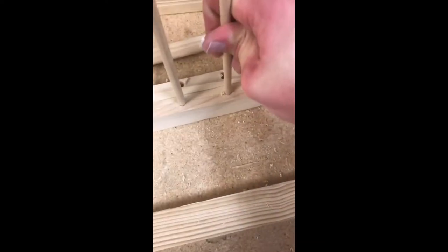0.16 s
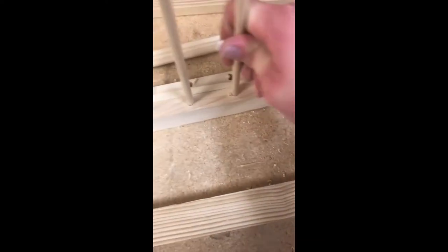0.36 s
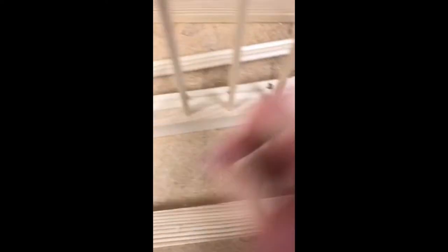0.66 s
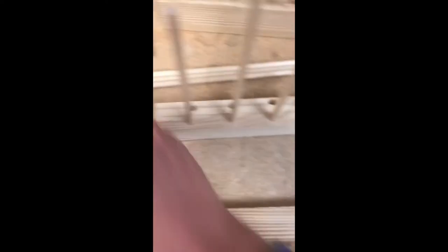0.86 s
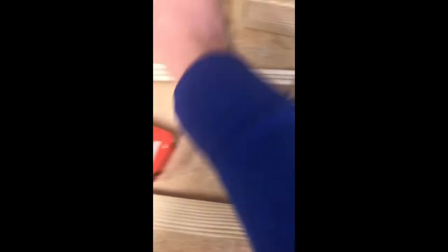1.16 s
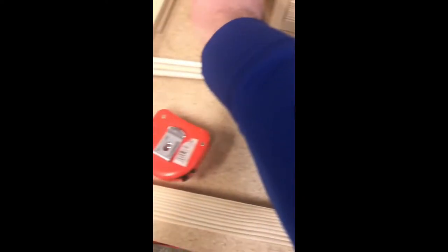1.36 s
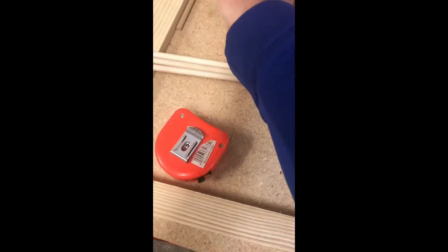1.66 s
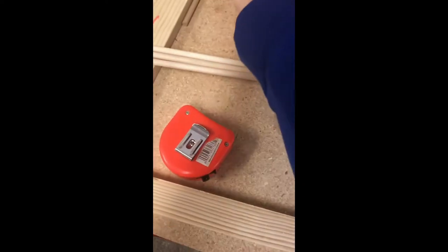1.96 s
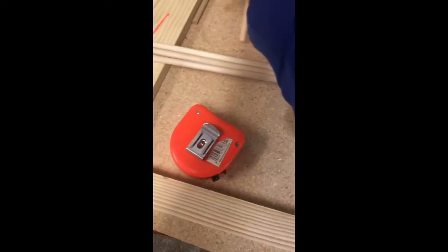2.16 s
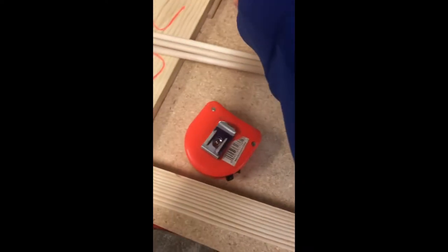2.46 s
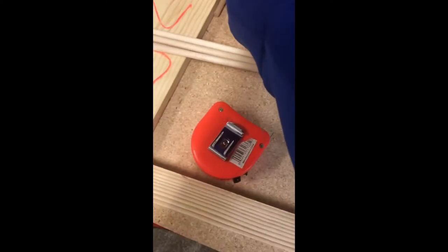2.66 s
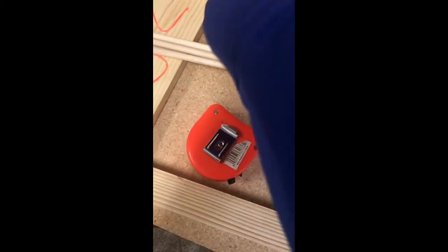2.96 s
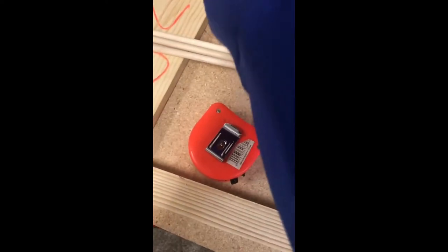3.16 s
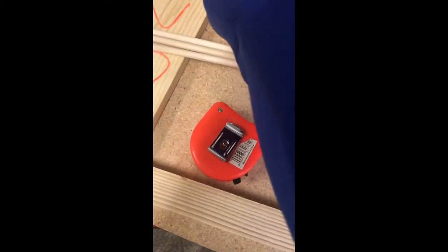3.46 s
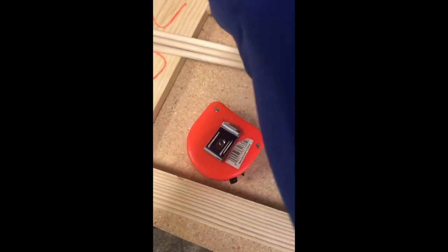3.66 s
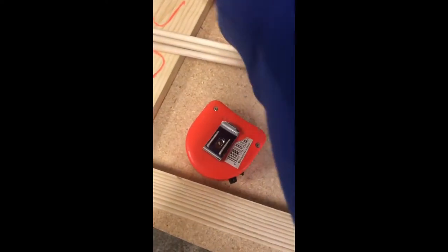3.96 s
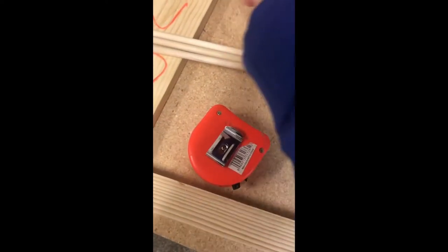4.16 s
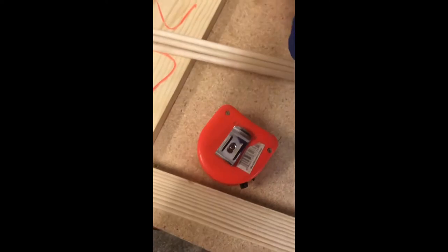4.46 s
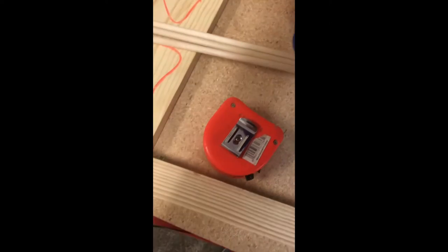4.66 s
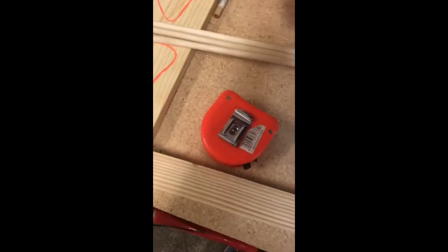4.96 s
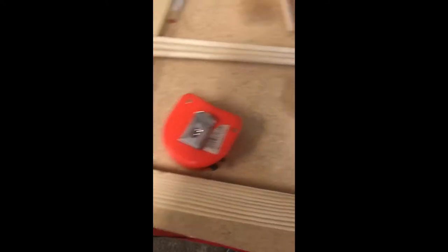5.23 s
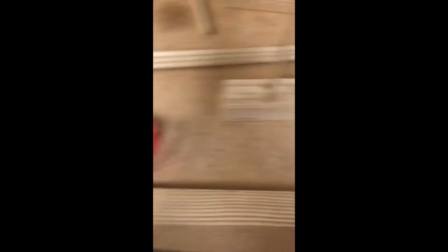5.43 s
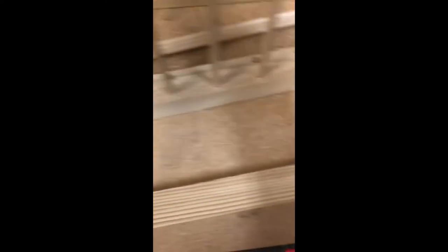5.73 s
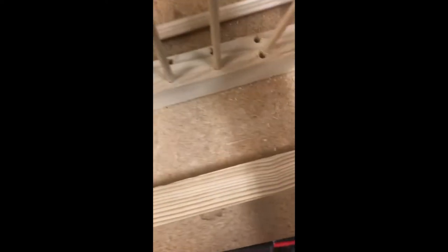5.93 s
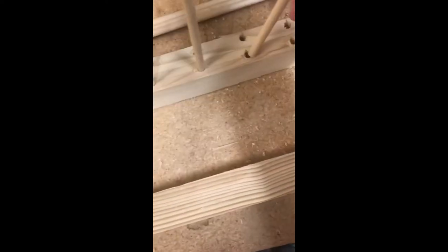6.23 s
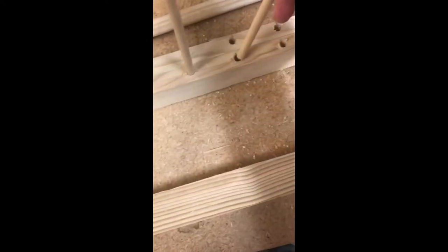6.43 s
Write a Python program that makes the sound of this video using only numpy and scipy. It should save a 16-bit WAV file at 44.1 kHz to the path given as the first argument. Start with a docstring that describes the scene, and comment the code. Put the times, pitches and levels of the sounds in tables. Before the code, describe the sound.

Close-up handling of loose wooden sticks: light ticks, a hollow knock, sharp bright clacks and brief scrapes in a quiet, faintly humming workshop.

```python
"""A small, faintly humming workshop: on a bench, a wooden dowel is pushed into a drilled rail, close to a phone.
Loose dowels are then slid, picked up and clacked together: noise cracks over ringing wood modes.
Coarse noise, spectrally shaped and sent through moving resonances, makes slides and swishes of dowel or sleeve.
Low modes make the bench thud and a board knock hollow; shaped, decaying noise makes two dull bumps.
Band-wise noise tails give the room's echo, under mains hum and shaped air noise."""
import sys
import numpy as np
from scipy import signal
from scipy.fft import rfft, irfft
from scipy.io import wavfile
from scipy.ndimage import uniform_filter1d

SR = 44100
rng = np.random.default_rng(int(sys.argv[2]) if len(sys.argv) > 2 else 0)


def store_wav(level_fs):
    """Save 16-bit WAV to argv[1]."""
    pcm = np.round(np.clip(np.atleast_2d(level_fs), -1, 1) * 32767)
    wavfile.write(sys.argv[1], SR, pcm.T.astype(np.int16))


N = 290619
TIME = np.arange(N) / SR  # s, the whole scene
AGE = np.arange(SR // 2) / SR  # s, since a blow

# Spectrum of the room's air noise. Each row: frequency in Hz, relative level in dB.
AIR_SPECTRUM = [(12, -37.5), (25, -17), (45, -5), (75, -9.5), (130, -15), (200, -13), (290, -14.5),
                (450, -19.5), (750, -22), (950, -21), (1200, -27), (3000, -31.5), (9000, -35.5),
                (16000, -36.5)]
AIR_DB = -64
# Mains hum. Each row: multiple of the mains frequency, mean level in dB.
HUM_HARMONICS = [(2, -66.5), (4, -70.5)]
MAINS_HZ = 60
# The workshop's echo. Each row: low edge in Hz, high edge in Hz, energy in dB, t60 in seconds.
ECHO_BANDS = [(80, 400, -18, 0.39), (648, 1365, -22, 0.4), (1500, 4930, -25.5, 0.35),
              (3950, 6800, -26, 0.17), (7810, 26000, -19, 0.18)]

# Dull bumps. Each row: start in seconds, level in dB, t60 in seconds.
BUMP_EVENTS = [(5.374, -47.5, 0.45), (5.488, -42.5, 0.21)]
# Spectrum of a bump. Each row: frequency in Hz, relative level in dB.
BUMP_SPECTRUM = [(30, -16.5), (90, 1.5), (160, -4), (300, -2.5), (500, -2), (800, 2.5), (1150, -8.5),
                 (1600, -16), (3000, -23), (6000, -59)]
# Hollow knocks on a board. Each row: start in seconds, level in dB.
KNOCK_EVENTS = [(0.364, -55.5), (1.683, -57.5), (1.9981, -30)]
# Free modes of the board. Each row: frequency in Hz, relative level in dB, t60 in seconds.
BOARD_MODES = [(600, 5, 0.19), (630, -15, 0.089), (1000, -9.5, 0.13), (1337, -11, 0.15),
               (1640, -5.5, 0.032)]

# Soft pushes on the bench top. Each row: start in seconds, level in dB before the mix, push pitch in Hz.
BENCH_PUSHES = [(0.225, -50, 198), (0.365, -41.5, 196), (.387, -45, 116), (1.143, -57, 92),
                (1.438, -41, 124), (1.585, -48, 118), (2.029, -50, 104), (2.516, -51.5, 166),
                (3.097, -50.5, 156), (3.191, -48.5, 177), (3.701, -53, 132), (3.9, -53.5, 120),
                (4.837, -40.5, 141), (5.504, -55, 129), (6.186, -53, 173)]
# Nominal modes of the bench top. Each row: frequency in Hz, relative level in dB, t60 in seconds.
BENCH_MODES = [(79, -3, 0.28), (109.3, -1.5, 0.28), (128, -2.5, 0.074), (184.5, 1.5, 0.097),
               (260.6, -4.5, 0.22), (336, -8.5, 0.03)]
# The bench's answer to each clack: dB relative to its weight, middle pitch, spread either way.
CLACK_THUD_DB, CLACK_PUSH_HZ, PUSH_SPREAD_OCT = -6, 153, 0.45

# Slides and swishes of a dowel or sleeve. Each row: start in seconds, length in seconds, then peak scrape
# and peak hiss in dB before the sliding gains.
STROKE_EVENTS = [(0.348, 0.14, -58, -53.5), (.45, .16, -67.5, -63), (.8, 0.52, -68.5, -72),
                 (1.25, 0.38, -78, -66.5), (1.545, 0.17, -62.5, -56), (1.664, 0.064, -61, -52),
                 (1.74, 0.25, -75, -67.5), (1.93, 0.17, -64, -56.5), (2.063, 0.12, -55.5, -52),
                 (2.214, 0.077, -52, -46.5), (2.35, .13, -68.5, -55), (2.5, 0.077, -66, -63),
                 (2.94, .15, -59, -58.5), (3.15, 0.073, -52.5, -59.5), (3.24, 0.22, -63, -68.5),
                 (3.55, 0.1, -69, -67.5), (3.678, 0.083, -44.5, -48.5), (3.83, 0.11, -46, -50),
                 (4.003, 0.046, -46, -49), (4.05, 0.35, -67, -55.5), (4.37, 0.074, -65.5, -58.5),
                 (4.54, 0.11, -62, -61.5), (4.624, 0.061, -53, -53), (4.81, 0.058, -49, -45.5),
                 (4.93, 0.21, -53.5, -62), (5.08, 0.095, -75, -53.5), (5.201, 0.3, -71, -62),
                 (5.48, 0.14, -85, -67.5), (5.65, 0.12, -83, -64), (6.3, 0.2, -67.5, -66.5)]
STROKE_RISE, STROKE_FALL = 0.26, 0.75  # shares of a stroke spent speeding up and slowing down
# Light rubbing while loose dowels are in hand: start in seconds, end in seconds.
HANDLING_SPAN = (1.5, 5.6)
HANDLING_SCRAPE_DB, HANDLING_HISS_DB = -75.5, -69  # before the sliding gains
# Spectrum of the scrape. Each row: frequency in Hz, relative level in dB.
SCRAPE_SPECTRUM = [(290, -45.5), (500, -14), (1010, -13.5), (1590, -1), (1870, -4.5), (2080, -6),
                   (3090, -3), (3820, -8.5), (4330, -8.5), (5000, -15.5), (6500, -43.5), (11000, -120)]
# Spectrum of the hiss. Each row: frequency in Hz, relative level in dB.
HISS_SPECTRUM = [(1500, -27), (3500, -11), (5000, -4), (7200, 0), (9000, -1), (11000, -1.5), (13500, -1.5),
                 (16000, -5)]
# Resonances of a sliding dowel. Each row: ratio to the main mode, width in Hz, relative level in dB.
SLIDE_RESONANCES = [(.515, 150.6, 0.5), (1, 342.8, -1.5), (1.56, 550.6, -1), (2.2, 750, -7),
                    (2.9, 1787, -8)]

# Main bending mode of the dowel in hand. Each row: time in seconds, pitch in Hz.
DOWEL_PITCH_PATH = [(.4, 4120), (1.55, 4870), (2.1, 4690), (2.9, 4500), (3.25, 4500), (3.92, 4450),
                    (4.3, 4540), (4.7, 4850), (5.1, 4737)]
# Nominal bending modes of a dowel. Each row: ratio to the main mode, relative level in dB, t60 in seconds.
DOWEL_MODES = [(.305, -22.5, .03), (.53, -14.5, 0.041), (0.774, -3.5, 0.016), (0.921, 2.5, .012),
               (1, 0, .045), (1.049, -3, 0.021), (1.55, -9, .028), (1.65, -13, .018), (2.211, -6, 0.028),
               (2.38, -4, 0.023), (2.9, -7, 0.013)]
# Dowel contacts. Each row: start in seconds, contact time in seconds, pitch of the wood that is hit in Hz,
# ring over crack in dB, treble level in dB before the mix, brightest pitch in Hz,
# weight on the bench in dB (the reference for low body and thud).
CLACK_EVENTS = [(0.2138, 0.0002, 1830, -9.5, -52.5, 6600, -65), (0.227, 0.0014, 1880, -5, -61, 8000, -56.5),
                (.362, 0.0012, 3170, -7, -48.5, 4550, -56), (0.385, 0.00026, 2580, 3, -44, 5300, -54.5),
                (1.436, 0.00017, 1670, -7, -44.5, 1820, -43),
                (1.5775, 0.00058, 2420, 1.5, -31.5, 6740, -48.5),
                (1.6566, 0.00017, 1260, -5, -35, 12000, -57), (1.674, 0.0021, 2600, 12, -40.5, 3470, -55.5),
                (1.7136, .0004, 2570, -7, -51, 11000, -72), (1.867, 0.00081, 2620, -20, -48, 10000, -60),
                (1.8792, 0.00065, 2700, -12, -32, 12000, -70),
                (1.909, 0.00065, 1660, -5, -42, 10100, -50.5), (2.012, 0.00054, 2680, -3, -37.5, 6300, -39),
                (2.1427, 0.0025, 2600, 7, -46, 2680, -51), (2.218, 0.0011, 1250, -7, -37.5, 2960, -46.5),
                (2.5363, 0.00088, 1800, -9, -45, 1900, -51),
                (2.8382, 0.0017, 1605, -6.5, -41.5, 2650, -51.5),
                (2.8692, 0.00078, 1820, -10.5, -20, 3000, -36),
                (2.8699, .0006, 3390, -2, -18.5, 10960, -56),
                (2.8819, 0.00049, 1380, -5.5, -40, 2980, -47.5),
                (2.9265, 0.0015, 2500, 15, -31.5, 4430, -46),
                (2.9681, 0.0012, 1420, -10.5, -33.5, 2800, -43.5), (3.051, .0007, 1630, -8, -52, 3430, -55),
                (3.2136, 0.00049, 3150, -4.5, -28.5, 2970, -55),
                (3.2321, 0.00068, 1740, -5, -31, 2780, -49.5), (3.24, 0.0034, 2680, -8, -35, 2020, -49.5),
                (3.2482, 0.00066, 2650, -8.5, -30.5, 3380, -51),
                (3.9131, 0.0001, 2334, -7, -16.5, 4710, -64), (3.9173, 0.00023, 2430, 7, -32, 4800, -68),
                (3.9263, 0.00024, 2380, -1, -43, 5000, -59), (4.011, 0.0025, 2704, 10, -41, 2820, -73),
                (4.019, .003, 2700, -20, -49, 11000, -75), (4.111, 0.00025, 2350, 8, -36, 6150, -51.5),
                (4.1237, 0.00033, 2550, 14, -43.5, 2180, -60), (4.5699, 0.00022, 1356, -15, -52, 3020, -40),
                (4.661, .0004, 2640, -1.5, -32.5, 5170, -45), (4.6862, 0.00074, 2540, -4, -35, 2170, -46.5),
                (4.8654, 0.0025, 2970, -22, -37, 9050, -52), (4.9065, 0.00053, 2550, 5, -49, 9520, -61),
                (4.9395, 0.0029, 2610, -0.5, -38, 3220, -51), (4.9476, .0006, 2560, -8, -36, 2900, -48),
                (4.987, 0.0004, 2530, -4, -35.5, 1970, -45), (5.0224, 0.0014, 1814, 8, -29, 4400, -47),
                (5.0315, 0.00038, 1792, 9.5, -28, 2860, -55), (5.047, 0.00063, 1850, -6, -23.5, 4200, -56),
                (5.061, 0.0006, 2770, -8, -27, 3180, -49.5), (5.083, 0.00045, 1800, -16, -44, 10600, -46),
                (5.1082, 0.00052, 1850, 13, -32.5, 4540, -48), (6.252, 0.0004, 1960, -5, -55.5, 8850, -73),
                (6.369, 0.002, 2310, -11, -56.5, 8060, -69.5),
                (6.4028, 0.001, 2020, -8.5, -58, 7500, -62.5),
                (6.5521, 0.00063, 1910, -4.5, -56, 8300, -63)]
# Edges of the bands that balance a contact, in Hz; the first band is its low body.
CLACK_BAND_EDGES = [300, 1200, 3200, 8000, 16000]
SKIRT_DB_PER_OCT = 12.5  # treble falls away on both sides of a contact's brightest pitch
BODY_DB = 0.5  # low wooden body of a contact, relative to its weight


def undb(db):
    """Decibels to gain."""
    return 10 ** (np.asarray(db) / 20)


def level(x, db, size=None):
    """Scale a sound so the rms of its first `size` samples (or of all) meets a level."""
    return x * undb(db) / np.sqrt(np.mean(x[:size] ** 2))


def band(x, lo_hz, hi_hz, order=3):
    """Causal band-pass."""
    edges_hz = [lo_hz, min(hi_hz, SR / 2 - 100)]
    return signal.sosfilt(signal.butter(order, edges_hz, "band", fs=SR, output="sos"), x)


def colour(x, points):
    """Shape a signal's spectrum by (Hz, dB) points."""
    hz, db = np.transpose(points)
    f = np.fft.rfftfreq(len(x), 1 / SR)
    gain = undb(np.interp(np.log(f + 1), np.log(hz), db))
    return irfft(rfft(x) * gain, len(x))


def fade(t60):
    """Exponential decay from the moment of a blow, 60 dB down after t60 seconds."""
    return np.exp(-np.log(1000) * AGE / t60)


def ring(modes):
    """Free vibration as a sum of decaying (Hz, dB, t60) sines."""
    return sum(undb(db) * fade(t60) * np.sin(2 * np.pi * hz * AGE) for hz, db, t60 in modes)


def walk(rate):
    """Smooth random wandering with a spread near 1, `rate` new values a second."""
    k = int(SR / rate)
    steps = np.repeat(rng.standard_normal(N // k + 1), k)
    return uniform_filter1d(steps, k)[:N]


def add(track, s, sound):
    """Mix a sound into the track at time s."""
    i = int(s * SR)
    track[i:i + len(sound)] += sound[:N - i]


def background(waver_db=1, drift_db=0.15):
    """Mains harmonics that waver slowly over gently drifting, shaped air noise."""
    hum = 0
    for multiple, db in HUM_HARMONICS:
        tone = np.sqrt(2) * np.sin(2 * np.pi * multiple * MAINS_HZ * TIME)
        hum = hum + undb(db + waver_db * walk(1.5)) * tone
    air = level(colour(rng.standard_normal(N), AIR_SPECTRUM), AIR_DB)
    return hum + air * undb(drift_db * walk(4.44))


def workshop(x, build_s=0.00468, first_wall_s=0.0017):
    """Dense echoes from near walls build up after a short gap; the treble dies sooner."""
    tail = 0
    onset = 1 - np.exp(-np.maximum(AGE - first_wall_s, 0) / build_s)
    for lo_hz, hi_hz, db, t60 in ECHO_BANDS:
        echo = band(rng.standard_normal(len(AGE)), lo_hz, hi_hz) * fade(t60) * onset
        tail = tail + undb(db) * echo / np.sqrt(np.sum(echo ** 2))
    return signal.fftconvolve(x, tail)[:N]


def bumps():
    """Dull bumps: mostly low noise that starts at once and dies away exponentially."""
    out = np.zeros(N)
    for s, db, t60 in BUMP_EVENTS:
        bump = colour(rng.standard_normal(len(AGE)), BUMP_SPECTRUM) * fade(t60)
        add(out, s, level(bump, db, size=900))
    return out


def knocks(push_s=0.0021, rattle_db=-12, rattle_t60=0.13, held_s=0.03):
    """A soft blow wakes hollow board modes, which the hand soon damps, over a faint noisy rattle."""
    out = np.zeros(N)
    for s, db in KNOCK_EVENTS:
        rattle = band(rng.standard_normal(len(AGE)), 345, 1400) * fade(rattle_t60)
        damped = ring(BOARD_MODES) / (1 + (AGE / held_s) ** 8)
        knock = level(damped, 0, size=500) + level(rattle, rattle_db, size=500)
        add(out, s, level(knock * (1 - np.exp(-AGE / push_s)), db, size=500))
    return out


def thuds(rattle_t60=0.15, rattle_db=-9, focus_db=8, give_s=0.00053, spot_db=3, spot_cycles=14):
    """The bench top gives under each push: the spot swings at its own pitch and favours nearby modes."""
    out = np.zeros(N)
    # the pitch under each clack varies from spot to spot
    spots_hz = CLACK_PUSH_HZ * 2 ** (PUSH_SPREAD_OCT * rng.uniform(-1, 1, len(CLACK_EVENTS)))
    under_clacks = [(s, weight_db + CLACK_THUD_DB, hz)
                    for (s, *_, weight_db), hz in zip(CLACK_EVENTS, spots_hz)]
    for s, db, push_hz in BENCH_PUSHES + under_clacks:
        detune = 1 + 0.013 * rng.standard_normal(len(BENCH_MODES))
        modes = [(hz * d, mode_db - focus_db * np.log2(hz / push_hz) ** 2, t60)
                 for (hz, mode_db, t60), d in zip(BENCH_MODES, detune)]
        spot = ring([(push_hz, spot_db, spot_cycles / push_hz)]) * (1 - np.exp(-AGE / give_s))
        # the whole top takes a moment to follow
        top = ring(modes) * (1 - np.exp(-AGE / (4 * give_s)))
        rattle = band(rng.standard_normal(len(AGE)), push_hz * 1.3, push_hz * 3, order=2) * fade(rattle_t60)
        thud = level(spot + top, 0, size=1300) + level(rattle, rattle_db, size=1300)
        add(out, s, level(band(thud, 60, 1600, order=2), db, size=1300))
    return out


def dowel_hz(s):
    """Main bending mode of the dowel in hand at time s."""
    return np.interp(s, *np.transpose(DOWEL_PITCH_PATH))


def stroke(start_s, length_s):
    """Speed of one slide or swish: it gathers quickly and eases to rest."""
    along = (TIME - start_s) / length_s
    ramp = np.minimum(along / STROKE_RISE, (1 - along) / STROKE_FALL)
    return np.sin(np.pi / 2 * np.clip(ramp, 0, 1))


def rubbing():
    """Strength of scrape and hiss: strokes add in power to light, steady handling."""
    start_s, end_s = HANDLING_SPAN
    held = uniform_filter1d(1. * ((TIME > start_s) & (TIME < end_s)), size=SR // 5)
    scrape = held * undb(HANDLING_SCRAPE_DB) ** 2
    hiss = held * undb(HANDLING_HISS_DB) ** 2
    for start_s, length_s, scrape_db, hiss_db in STROKE_EVENTS:
        power = stroke(start_s, length_s) ** 2
        scrape = scrape + power * undb(scrape_db) ** 2
        hiss = hiss + power * undb(hiss_db) ** 2
    return np.sqrt(np.abs(scrape)), np.sqrt(np.abs(hiss))


def sliding(grain_db=4, catch_db=4.0, ring_db=-1, roll_db=4, press=0.4, firm_db=-58,
            scrape_gain_db=-1, hiss_gain_db=-2):
    """A rubbed surface catches and slips: dense tiny ticks that scrape, hiss and ring the dowels."""
    scrape_gain, hiss_gain = rubbing()
    grain = grain_db * np.minimum(rng.exponential(size=N), 6)
    slips = rng.standard_normal(N) * undb(grain + catch_db * walk(140))
    pitch_hz = dowel_hz(TIME) * (1 + .012 * walk(25))
    turn = 2 * np.pi * np.cumsum(pitch_hz) / SR
    rings = 0
    for ratio, width_hz, db in SLIDE_RESONANCES:
        # shift down, low-pass and shift back: a resonance that follows the dowel's pitch
        carrier = np.exp(1j * ratio * turn)
        narrow = signal.sosfilt(signal.butter(2, width_hz / 2, fs=SR, output="sos"), slips / carrier)
        # it swells as the contact point moves
        rings = rings + undb(db + roll_db * walk(16)) * (narrow * carrier).real
    # a light touch mostly hisses; a firm one sets the dowel ringing
    firmness = np.minimum(hiss_gain / undb(firm_db), 1) ** press
    # the fingers damp it on and off, so the ringing comes in patches
    firmness = firmness * np.clip(.5 + walk(11), 0, 1.5)
    hiss = level(colour(slips, HISS_SPECTRUM), 0) + level(rings, ring_db) * firmness
    scrape = level(colour(slips, SCRAPE_SPECTRUM), scrape_gain_db)
    return scrape * scrape_gain + level(hiss, hiss_gain_db) * hiss_gain


def soften(x, corner_hz=7000):
    """Soft wood rounds off the treble of each contact."""
    return signal.sosfilt(signal.butter(1, min(corner_hz, SR / 3), fs=SR, output="sos"), x)


def treble_shares(bright_hz):
    """Share in dB of each treble band in a contact that is brightest at the given pitch."""
    edges = np.array(CLACK_BAND_EDGES[1:], float)
    centres_hz = np.sqrt(edges[:-1] * edges[1:])
    db = -SKIRT_DB_PER_OCT * np.abs(np.log2(centres_hz / bright_hz))
    return db - 10 * np.log10(np.sum(undb(db) ** 2))


def clacks(crack_s=0.00032, smear=1.8, chatter_t60=0.049, chatter_db=-25, scatter_db=2,
           wood_db=-4, wood_t60=0.054, bright_width_oct=1.8):
    """Wood meets wood: a noise crack shaped by the contact, a little chatter, and both pieces ring."""
    out = np.zeros(N)
    for s, contact_s, wood_hz, share_db, clack_db, bright_hz, weight_db in CLACK_EVENTS:
        # the point of contact decides how strongly each mode speaks; the main mode stays put
        chance = rng.standard_normal((len(DOWEL_MODES), 2))
        modes = []
        for (ratio, db, t60), (detune, strength) in zip(DOWEL_MODES, chance):
            free = ratio != 1
            hz = dowel_hz(s) * ratio * (1 + 0.0067 * detune * free)
            modes.append((hz, db + scatter_db * strength * free, t60))
        modes.append((wood_hz, wood_db, wood_t60))
        # a glancing contact builds up slowly and scuffs for longer
        bite = 1 - np.exp(-AGE / contact_s)
        scuff = np.exp(-AGE / (crack_s + smear * contact_s)) + undb(chatter_db) * fade(chatter_t60)
        crack = level(bite * rng.standard_normal(len(AGE)) * scuff, 0, size=400)
        blow = soften(crack + level(bite * ring(modes), share_db, size=400))
        # each contact is brightest around one pitch
        spread = 2 ** (bright_width_oct / 2)
        blow = band(blow, bright_hz / spread, bright_hz * spread, order=1)
        band_db = [weight_db + BODY_DB, *(clack_db + treble_shares(bright_hz))]
        for lo, hi, db in zip(CLACK_BAND_EDGES, CLACK_BAND_EDGES[1:], band_db):
            add(out, s, level(band(blow, lo, hi, order=4), db, size=400))
    return out


def scene(clack_db=-4.5, thud_db=-1.0, knock_echo_db=-5, thud_echo_db=-4):
    """Everything on the bench, its echo and the quiet room."""
    wood = undb(clack_db) * clacks() + bumps() + sliding()
    bench, board = undb(thud_db) * thuds(), knocks()
    # bench and board are close to the phone and radiate little into the room
    echo = workshop(wood + undb(thud_echo_db) * bench + undb(knock_echo_db) * board)
    return (wood + bench + board + echo + background())[None]


def record(dry):
    """The phone cuts the top with a steep low-pass at 16 kHz."""
    return signal.sosfilt(signal.ellip(10, .2, 70, 16000, fs=SR, output="sos"), dry)


dry = scene()
out = record(dry)
store_wav(out)
```